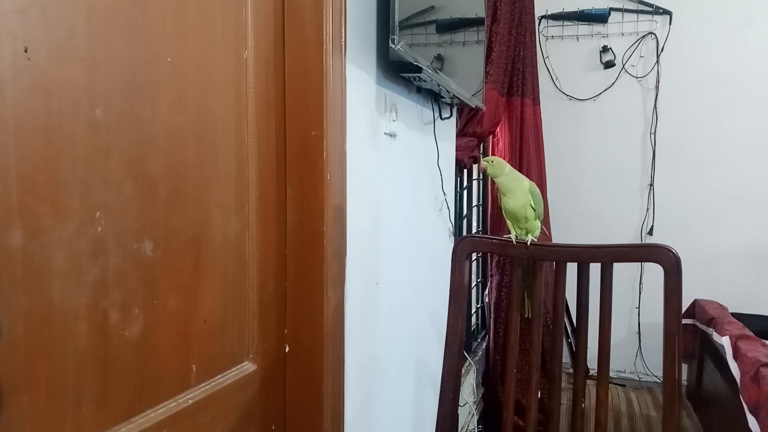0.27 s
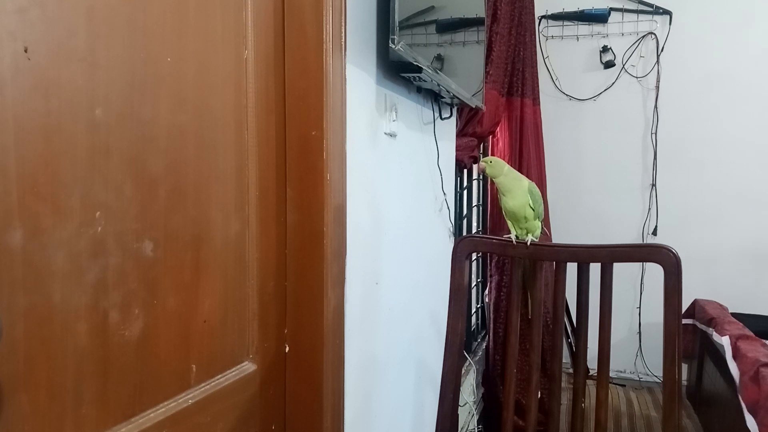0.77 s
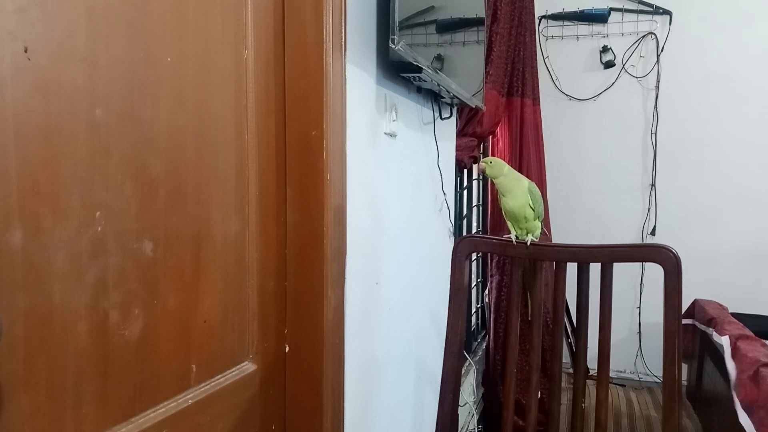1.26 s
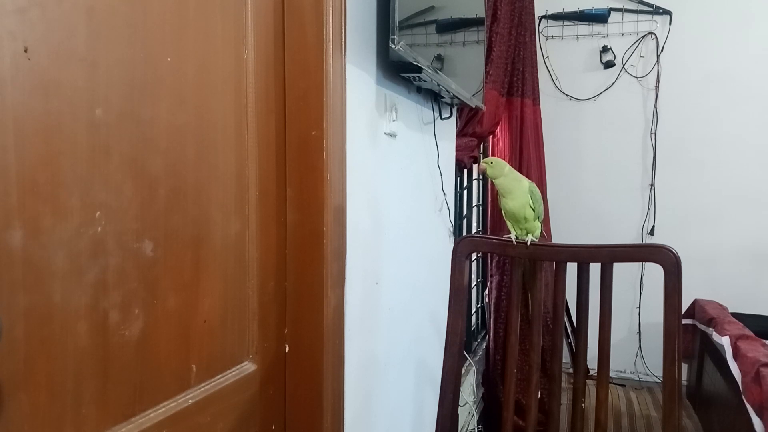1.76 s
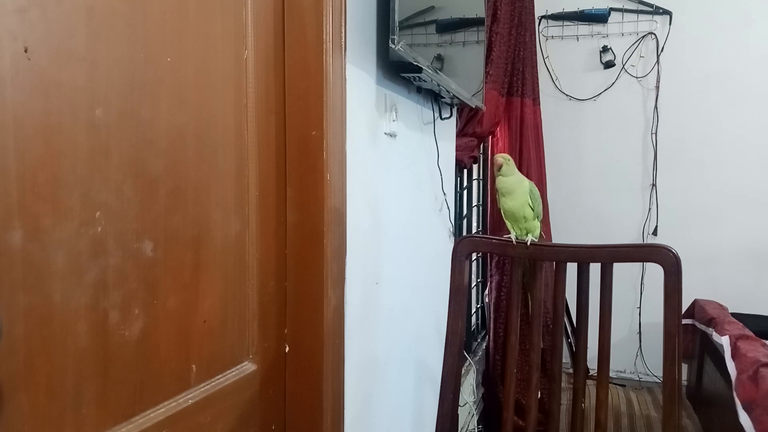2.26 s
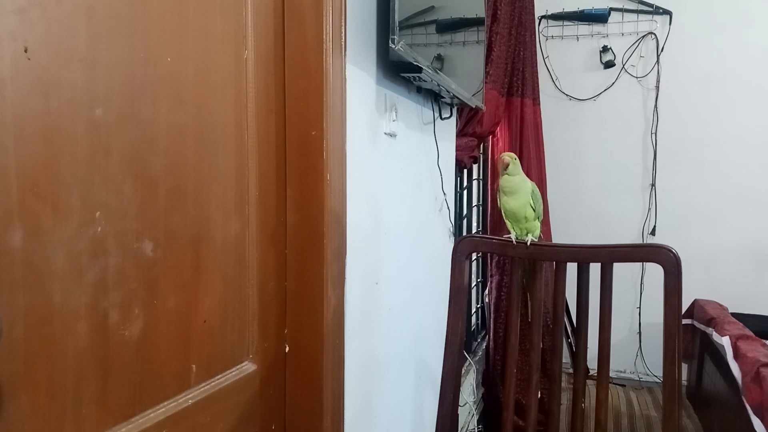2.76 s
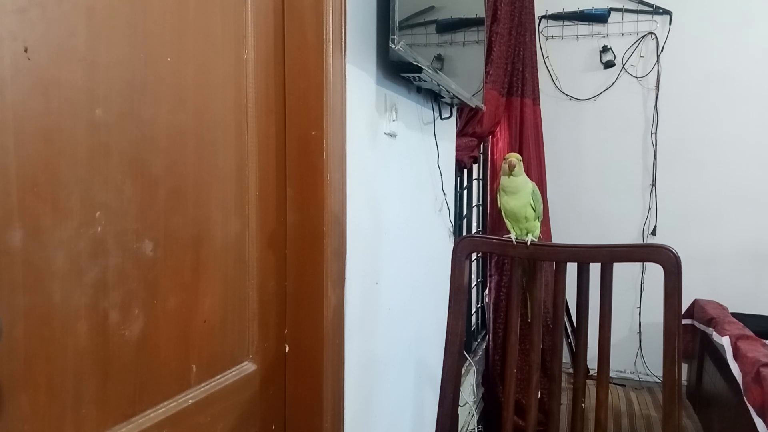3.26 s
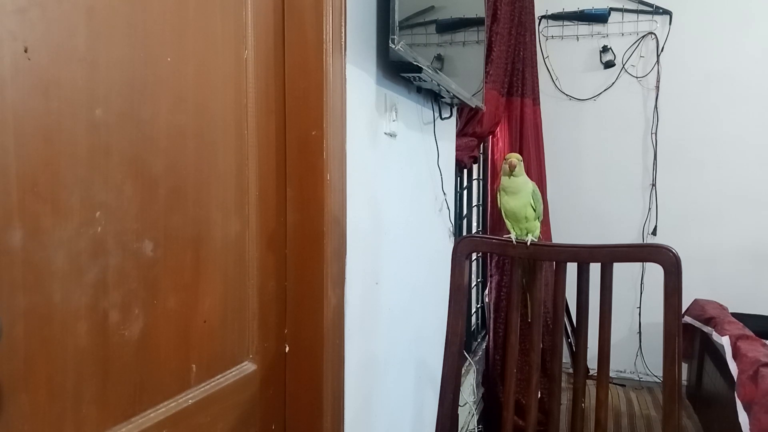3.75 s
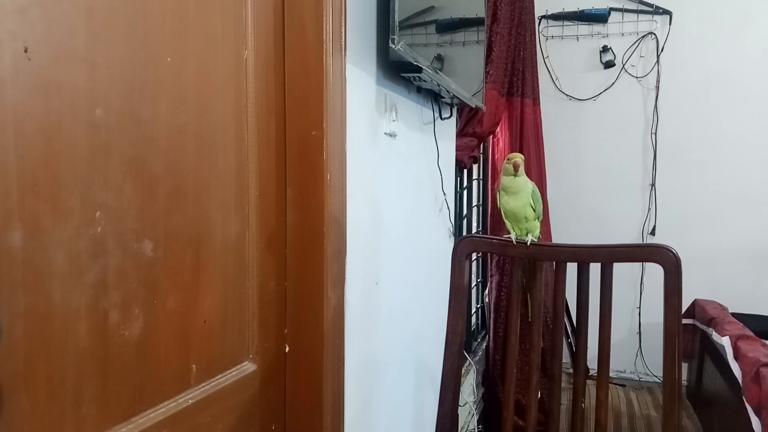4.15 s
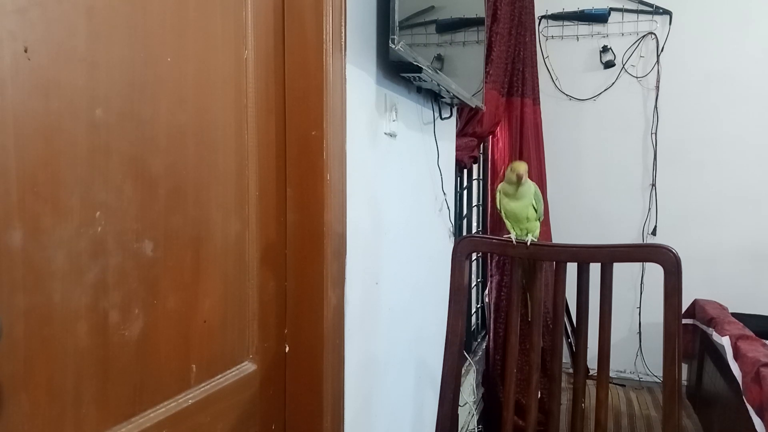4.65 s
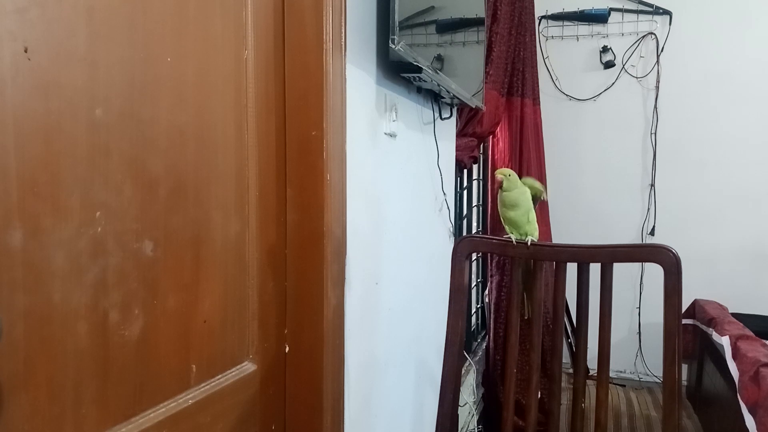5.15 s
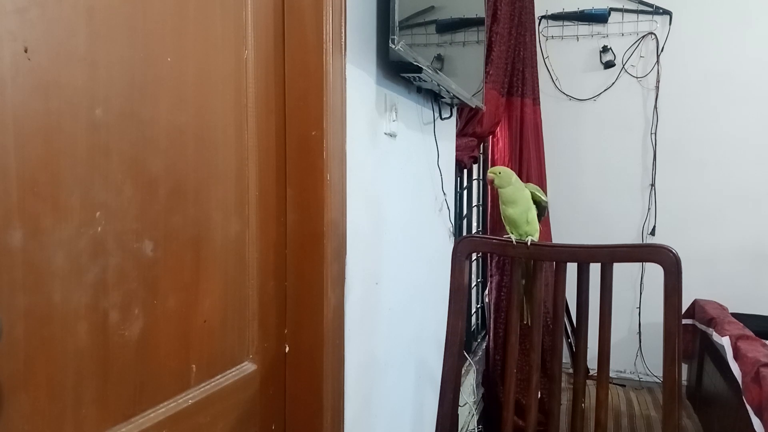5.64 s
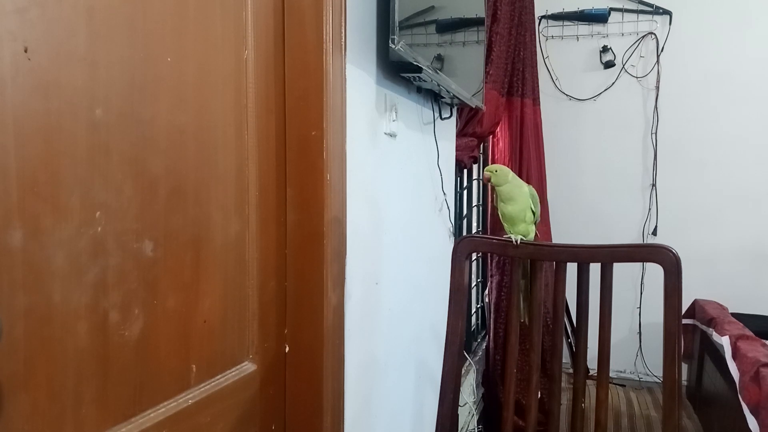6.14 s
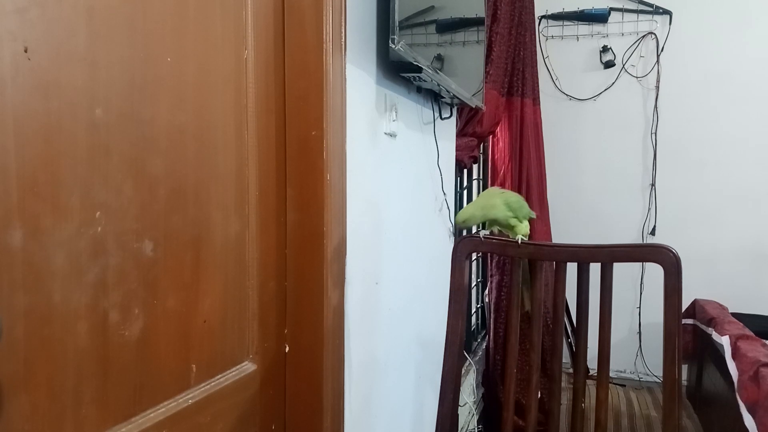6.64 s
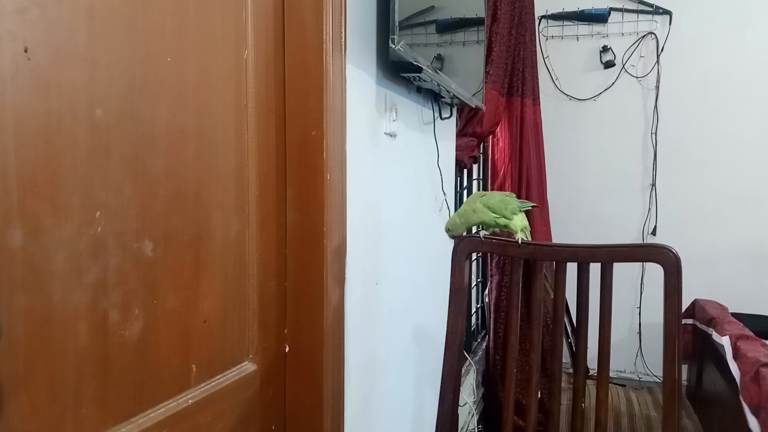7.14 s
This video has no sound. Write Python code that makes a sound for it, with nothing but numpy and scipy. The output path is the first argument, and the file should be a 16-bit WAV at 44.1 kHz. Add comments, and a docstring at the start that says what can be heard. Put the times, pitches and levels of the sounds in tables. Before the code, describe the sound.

A pet parrot calls alone in a small hard-walled room. A clipped squawk and a beak click open, then a short bark, thin whistles and spaced high chirps. A sudden piercing scream cuts in after five seconds, followed by softer chirps and two long rough screeches near the end. Each call rings briefly. Soft air and unsteady low hum stay underneath; a single mono microphone ducks at the loudest calls.

```python
"""A pet parrot chirps, whistles, rasps, barks, screams and screeches in a small hard-walled room.
Its syrinx makes a gliding harmonic tone, lightly shaken in the chirps and strongly in the harsh calls,
mixed with turbulent hiss and coloured by throat and beak; the beak also clicks, as a burst of noise.
Decaying noise lets the room ring after every call, over a wavering rush of air and an unsteady hum.
A gain control ducks under the loudest calls, and the extreme treble is cut off."""
import sys
import numpy as np
from scipy import signal
from scipy.fft import rfft, irfft
from scipy.io import wavfile
from scipy.ndimage import uniform_filter1d

SR = 44100
rng = np.random.default_rng(int(sys.argv[2]) if len(sys.argv) > 2 else 0)


def store_pcm(level_fs):
    """Save levels as 16-bit WAV."""
    pcm = np.round(np.clip(level_fs, -1, 1) * 32767).astype(np.int16)
    wavfile.write(sys.argv[1], SR, np.atleast_2d(pcm).T)


N = 326781
CUTOFF_HZ = 15800   # top of the voice's harmonics and of the finished sound


def parrot():
    """One syrinx sings every call: chirps, whistles, barks, rasps, a scream and long screeches."""
    out = np.zeros(N)
    for kind, table in ((chirp, CHIRP_CALLS), (whistle, WHISTLE_CALLS), (bark, BARK_CALLS), (rasp, RASP_CALLS)):
        for start_s, *shape in table:
            add(out, start_s, kind(*shape))
    add(out, SCREAM_START_S, scream_high())
    add(out, SCREAM_BREAK_S, scream_low())
    for row in SCREECH_CALLS:
        add(out, row[0], screech(*row))
    return out


# the scream: a pure high note gives way to a bright lower note, which tumbles down
SCREAM_START_S, SCREAM_BREAK_S, SCREAM_TUMBLE_S, SCREAM_END_S = 5.078, 5.139, 5.19, 5.288


def scream_high(pitch_hz=2738, scoop_hz=170, scoop_s=0.0069, flick_hz=150, flick_lead_s=0.0135,
                level_db=-9, swell_db=20, swell_s=0.034, rough=0.071, bright_db=-4, lift_db=-3,
                soft_lift_db=-9, flick_lift_db=7, flick_loss_db=2):
    """The pure opening of the scream scoops up to pitch, swells, and flicks up just before it breaks."""
    length_s = SCREAM_BREAK_S - SCREAM_START_S
    t = np.arange(0, length_s, 1 / SR)
    slack = 1 - ramp(t, swell_s)
    flick = step(t, length_s - flick_lead_s, 0.002)
    pitch = pitch_hz - scoop_hz * np.exp(-t / scoop_s) + flick_hz * flick
    loudness_db = level_db - swell_db * slack - flick_loss_db * flick
    second_db = lift_db + soft_lift_db * slack + flick_lift_db * flick
    return open_voice(pitch, loudness_db, rough, bright_db, second_db)


def scream_low(pitch_hz=2232, sag_hz_per_s=1200, tumble_hz=455, tumble_s=0.0079, level_db=-14,
               fade_db_per_s=25, rough=0.094, tumble_rough=0.12, bright_db=4, tumble_dull_db=3.5,
               lift_db=3.0, tumble_lift_db=3, odd_db=-8):
    """The lower note, its odd overtones held back at first, sags, then tumbles, rougher and duller."""
    t = np.arange(0, SCREAM_END_S - SCREAM_BREAK_S, 1 / SR)
    fallen = step(t, SCREAM_TUMBLE_S - SCREAM_BREAK_S, tumble_s)
    pitch = pitch_hz - sag_hz_per_s * t - tumble_hz * fallen
    loudness_db = level_db - fade_db_per_s * t
    slope_db = bright_db - tumble_dull_db * fallen
    second_db = lift_db + tumble_lift_db * fallen
    held_back_db = odd_db * (1 - ramp(fallen, 0.18))
    return open_voice(pitch, loudness_db, rough + tumble_rough * fallen, slope_db, second_db, odd_db=held_back_db)


# voice in each register: pitch_hz, level_db, brightness_db_per_octave, second_harmonic_lift_db
GROWL, HIGH, CLOSE = (1652, -6, -3, 10.5), (2659, -1.5, 3, 3), (1975, 4.4, 2.3, 10.6)
CLOSE_ROUGH = 0.25
REGISTER_CHANGE_S, SLACK_HZ, SLACK_S = 0.00755, 241.8, 0.038   # change width; depth and half width of the sag
SCREECH_FADE_DB, SCREECH_FADE_S, SCREECH_ONSET_HZ = 17, 0.039, 170   # the growl fades in, sinking in pitch
# long screeches, from low growl through a leap to the high register, then a drop to the closing tone:
# start_s, leap_s, slackest_s, drop_s, end_s, level_db (the register's level is added),
# growl_roughness (0-1), high_roughness (0-1)
SCREECH_CALLS = [(6.021, 6.126, 6.14, 6.245, 6.303, -31.5, .32, 0.48),
                 (6.996, 7.044, 7.105, 7.25, 7.31, -32.5, 1.01, .62)]


def screech(start_s, leap_s, slack_s, drop_s, end_s, level_db, growl_rough, high_rough,
            change_rough=0.32, wobble=0.0153, wobble_hz=70):
    """The syrinx jumps between registers in one go and turns rougher during each change."""
    t = np.arange(start_s, end_s, 1 / SR)
    leapt = step(t, leap_s, REGISTER_CHANGE_S)
    dropped = step(t, drop_s, REGISTER_CHANGE_S)
    high = leapt - dropped
    shares = np.array([1 - leapt, high, dropped])
    pitch, register_db, bright_db, lift_db = np.transpose([GROWL, HIGH, CLOSE]) @ shares
    rough = np.array([growl_rough, high_rough, CLOSE_ROUGH]) @ shares + change_rough * np.sin(np.pi * high)
    fading = 1 - ramp(t - start_s, SCREECH_FADE_S)
    sag_hz = SLACK_HZ * high * np.exp(-((t - slack_s) / SLACK_S) ** 2)
    pitch = pitch + SCREECH_ONSET_HZ * fading - sag_hz
    pitch = pitch * (1 + wobble * rough * tremble(wobble_hz, len(t)))
    loudness_db = level_db + register_db - SCREECH_FADE_DB * fading
    return harsh_voice(reshaped(PINCHED_THROAT), pitch, loudness_db, rough * (1 - fading ** 2), bright_db, lift_db)


# a bark starts flat by a share of its pitch, and softer, for a share of its length
BARK_SCOOP, BARK_RISE_AT, BARK_SWELL_DB = 0.09, 0.35, 4
# short harsh barks: start_s, length_s, pitch_hz, level_db, roughness (0-1),
# brightness_db_per_octave, second_harmonic_lift_db
BARK_CALLS = [(0, 0.016, 1668, -16.5, 0.78, -2, 8), (1.578, .047, 1562, -24, 0.7, -1.5, 3)]


def bark(length_s, pitch_hz, level_db, rough, bright_db, lift_db, snap_s=0.0024):
    """An abrupt rough note that snaps up to its pitch and full strength."""
    t = np.arange(0, length_s, 1 / SR)
    slack = 1 - step(t, BARK_RISE_AT * length_s, snap_s)
    pitch = pitch_hz * (1 - BARK_SCOOP * slack)
    return harsh_voice(THROAT_COLOUR, pitch, level_db - BARK_SWELL_DB * slack, rough, bright_db, lift_db)


# rise to full level; place (0-1) and width of the surge; half width of the flick
CHIRP_SWELL_DB, CHIRP_SURGE_AT, CHIRP_SURGE_S, FLICK_S = 17.5, 0.48, 0.0077, 0.0169
# chirps that swell, glide and flick up once: start_s, length_s, pitch_hz, glide_hz, flick_hz,
# flick_place (0-1), level_db (at full effort), roughness (0-1, at full effort),
# brightness_db_per_octave (at full effort), second_harmonic_lift_db
CHIRP_CALLS = [ (3.075, 0.1, 2855, -78, 183, 0.41, -33, 0.18, -3.5, 2.5),
               (3.755, 0.11, 2608, 18.5, 119.6, 0.74, -36, 0.2, -0.5, 4),
               (4.55, .11, 2591, -80, 73, 0.85, -38.5, .11, 4, 1.5),
               (5.451, .11, 2468, 218, 170, .75, -35.5, 0.23, 0, 2.5),
               (5.711, 0.094, 3036, -91, 75.2, 0.34, -41, 0.3, -1, -7)]


def chirp(length_s, pitch_hz, glide_hz, flick_hz, flick_at, level_db, rough, bright_db, lift_db,
          soft_dull_db=3, surge_share=0.3):
    """Effort builds steadily, then surges midway; it makes the note louder, brighter and rougher."""
    t = np.arange(0, length_s, 1 / SR)
    surge_s = CHIRP_SURGE_AT * length_s
    effort = (1 - surge_share) * ramp(t, surge_s) + surge_share * step(t, surge_s, CHIRP_SURGE_S)
    flick = np.exp(-((t - flick_at * length_s) / FLICK_S) ** 2)
    pitch = pitch_hz + glide_hz * t / length_s + flick_hz * flick
    loudness_db = level_db - CHIRP_SWELL_DB * (1 - effort)
    slope_db = bright_db - soft_dull_db * (1 - effort)
    return clear_voice(pitch, loudness_db, rough * (1 + effort) / 2, slope_db, lift_db)


WHISTLE_FADE_S, WHISTLE_FADE_DB = 0.03, 6.5
# thin whistles: start_s, length_s, pitch_hz, glide_hz, level_db (once faded in), roughness (0-1),
# brightness_db_per_octave, second_harmonic_lift_db
WHISTLE_CALLS = [ (0, 0.037, 2430, 9, -40, 0, -11, 2), (1.694, 0.0714, 2501, -140, -34, 0.06, -14, 7),
                 (2.498, 0.19, 2087, 3.5, -75, 0.15, -10, 7), (3.44, .15, 3037, 34, -65, 0.2, -11, 3),
                 (4.967, 0.13, 2944, -36, -59, 0.68, -12, -3),
                 (5.768, 0.047, 2106, -1, -54.5, 0.2, -16, 11),
                 (6.476, .085, 2817, -190, -43, 0.19, -9, 0.5), (6.844, 0.23, 2855, 386, -63, 0.64, -10, 1),
                 (6.963, 0.07, 1793, 37, -53, 0.22, -10, 1), (7.2, 0.049, 2014, -15, -30.5, .15, -1, 18)]


def whistle(length_s, pitch_hz, glide_hz, level_db, rough, bright_db, lift_db):
    """A thin tone that glides in a straight line, fades in and holds its level."""
    t = np.arange(0, length_s, 1 / SR)
    fade_db = WHISTLE_FADE_DB * (1 - ramp(t, WHISTLE_FADE_S))
    return clear_voice(pitch_hz + glide_hz * t / length_s, level_db - fade_db, rough, bright_db, lift_db)


RASP_SWELL_DB, RASP_PEAK_AT, RASP_ROUGH = 9, 0.46, 0.8   # place of full level (0-1), roughness at the end (0-1)
# soft low rasps: start_s, length_s, pitch_hz, level_db (once swelled),
# brightness_db_per_octave, second_harmonic_lift_db
RASP_CALLS = [(2.892, 0.091, 1219, -53.5, -2, 0.5), (3.568, .11, 801, -50, 3.5, 14.5),
              (4.375, .11, 818, -52.5, 3, 8)]
# relative colour of throat and beak in the soft rasps: frequency_hz, gain_db
RASP_COLOUR = [(800, 6.5), (1600, -1.5), (2400, 6), (3100, -3.5), (3700, 1.5), (4700, -9.5), (6200, -1),
               (7700, -20), (8700, -14), (10500, -35), (15000, -49)]


def rasp(length_s, pitch_hz, level_db, bright_db, lift_db, climb=0.03):
    """A low, soft tone that grows rougher as turbulent hiss rises beside it."""
    t = np.arange(0, length_s, 1 / SR)
    along = t / length_s
    pitch = pitch_hz * (1 + climb * (along - 0.5))
    loudness_db = level_db - RASP_SWELL_DB * (1 - ramp(along, RASP_PEAK_AT))
    return call(pitch, loudness_db, RASP_ROUGH * along, bright_db, lift_db, RASP_COLOUR,
                jitter=0.055, jitter_hz=290, shimmer=0.49, hiss_db=1.5)


# extra colour of the wide-open beak in the scream: frequency_hz, gain_db
OPEN_BEAK = [(1450, -0.5), (2000, 0.5), (3300, 2.5), (4100, -2.5), (5200, 7.5), (5900, 3.5), (6800, -5),
             (8700, 7), (10500, -1.5), (15000, 4.5)]


def open_voice(*controls, odd_db=0):
    """The full voice through a wide-open beak."""
    return call(*controls, reshaped(OPEN_BEAK), jitter=0.064, jitter_hz=420, shimmer=0.61,
                hiss_db=-15, odd_db=odd_db)


# extra colour of the tightened throat in a screech: frequency_hz, gain_db
PINCHED_THROAT = [(2000, -0.5), (2600, 8.5), (3300, -7.5), (4100, -1), (5200, -3), (7000, 1), (8400, -4.5),
                  (10000, 6.5), (15800, 1)]


def harsh_voice(throat, *controls):
    """The forced, shaken voice of barks and screeches."""
    return call(*controls, throat, jitter=0.062, jitter_hz=420, shimmer=0.62, hiss_db=-14)


# extra colour of the half-shut beak in chirps and whistles, dull at the top: frequency_hz, gain_db
HALF_SHUT_BEAK = [(4100, 1), (5200, 0), (11000, -1.5), (13500, -6.5)]


def clear_voice(*controls):
    """The light voice of chirps and whistles, with soft edges."""
    return call(*controls, reshaped(HALF_SHUT_BEAK), jitter=0.08, jitter_hz=200, shimmer=0.4,
                hiss_db=-26.5, edge_s=0.0048)


# relative colour of throat and beak in the full voice: frequency_hz, gain_db
THROAT_COLOUR = [(1000, -34.5), (1450, -7), (2000, -3.5), (2700, 2.5), (3300, 3.5), (4100, -1.5),
                 (5200, -0.5), (5900, -2), (6800, 3), (7700, -11), (8700, -10.5), (9300, -17), (10500, -21),
                 (12000, -39.5), (13800, -38), (14700, -36.5), (15800, -33.5)]


def reshaped(extra):
    """The throat's resonances with an extra colour on top."""
    return [(hz, db + at_hz(extra, hz)) for hz, db in THROAT_COLOUR]


def call(pitch, level_db, rough, bright_db, lift_db, throat, jitter, jitter_hz, shimmer, hiss_db,
         edge_s=0.0023, odd_db=0):
    """A harmonic tone, its pitch and strength shaken by roughness, and turbulent air pass the throat."""
    size = len(pitch)
    t = np.arange(size) / SR
    rough = np.clip(rough, 0, 1)
    shaken_pitch = pitch * (1 + jitter * rough * tremble(jitter_hz, size))
    phase = 2 * np.pi * np.cumsum(shaken_pitch) / SR
    k = np.arange(1, 17)[:, None]   # harmonic numbers
    harmonic_db = bright_db * np.log2(k) + lift_db * (k == 2) + odd_db * (k % 2) * (k > 1)
    weight = from_db(harmonic_db) * (k * pitch < CUTOFF_HZ)
    # strength the throat would let through, divided out so that level_db sets the loudness
    passed = np.sqrt(np.sum((weight * from_db(at_hz(throat, k * pitch))) ** 2, axis=0) / 2)
    shake = rms_one(np.exp(shimmer * rough * tremble(jitter_hz, size)))
    syrinx = shake * np.sum(weight * np.sin(k * phase), axis=0) / passed
    # the shaking harmonics slide through the fixed resonances of throat and beak
    tone = irfft(rfft(syrinx) * from_db(at_hz(throat, np.fft.rfftfreq(size, 1 / SR))), size)
    hiss = from_db(hiss_db) * rough * coloured_noise(throat, size)
    envelope = from_db(level_db) * ramp(np.minimum(t, t[-1] - t), edge_s)
    return envelope * (tone + hiss)


# sharp clicks of the beak: start_s, level_db (of the noise before it decays)
BEAK_CLICKS = [(0.175, -33)]
# relative colour of a click: frequency_hz, gain_db
BEAK_COLOUR = [(1500, -34), (4000, -27), (6300, 5.5), (8000, -8), (11000, -14), (15500, -18)]


def beak(decay_s=0.0043):
    """A hard, bright snap of noise that dies in a few milliseconds."""
    out = np.zeros(N)
    t = np.arange(SR // 20) / SR
    for start_s, level_db in BEAK_CLICKS:
        snap = coloured_noise(BEAK_COLOUR, len(t)) * np.exp(-t / decay_s)
        add(out, start_s, from_db(level_db) * snap)
    return out


# time for the room's tail to fall by 60 dB: frequency_hz, decay_s
ROOM_DECAY = [(1000, .6), (2800, 0.46), (5500, 0.42), (8500, 0.34), (15000, 0.3)]


def room(x, wet_db=-1.5, early_db=-3.5, early_s=0.051, first_echo_s=0.0013):
    """Hard walls answer with a diffuse noise tail, stronger at its start and shorter in the treble."""
    t = np.arange(SR) / SR
    hz = np.fft.rfftfreq(SR, 1 / SR)
    white = rfft(rng.standard_normal(SR))
    tail = 0
    # overlapping bands, each with its own decay
    for share, (centre_hz, t60) in zip(np.eye(len(ROOM_DECAY)), ROOM_DECAY):
        band = at_hz(np.column_stack([np.array(ROOM_DECAY)[:, 0], share]), hz)
        tail = tail + irfft(white * band, SR) * np.exp(-np.log(1000) * t / t60)
    tail = tail * (1 + from_db(early_db) * np.exp(-t / early_s)) * (t > first_echo_s)
    tail = tail / np.sqrt(np.sum(tail ** 2))
    return x + from_db(wet_db) * signal.fftconvolve(x, tail)[:N]


AIR_DB = -50   # level around which the air wavers
# relative spectrum of the steady air: frequency_hz, density_db_per_hz
AIR_COLOUR = [(25, -41), (45, -33.5), (100, -13.5), (150, -6.5), (350, -8), (530, -16.5), (850, -15),
              (1500, -21.5), (2700, -29), (3500, -43), (7000, -48), (8800, -54.5), (11000, -64.5),
              (16000, -60.5)]
# unsteady hum lines: pitch_hz, width_hz, level_db
HUM_LINES = [(69.6, 14, -73), (139.4, 19, -54), (605, 7.3, -65), (1127, 10, -69.5)]


def background(waver_db=1.94):
    """Noise makes a soft, wavering rush of air; randomly beating tones make a hum, as from a fan."""
    out = from_db(AIR_DB + waver_db * tremble(8, N)) * coloured_noise(AIR_COLOUR, N)
    for hz, width_hz, level_db in HUM_LINES:
        carrier = 2 * np.pi * hz * np.arange(N) / SR
        line = tremble(width_hz, N) * np.cos(carrier) + tremble(width_hz, N) * np.sin(carrier)
        out = out + from_db(level_db) * line
    return out


def from_db(db):
    """Decibels to gain."""
    return 10 ** (np.asarray(db) / 20)


def rms_one(x):
    """Scale to unit power."""
    return x / np.sqrt(np.mean(x ** 2) + 1e-20)


def at_hz(points, hz):
    """Read a table along a log-frequency axis."""
    known_hz, values = np.transpose(points)
    return np.interp(np.log(np.maximum(hz, 1)), np.log(known_hz), values)


def coloured_noise(spectrum, size):
    """Noise of unit power with the shape of the given spectrum."""
    hz = np.fft.rfftfreq(size, 1 / SR)
    return rms_one(irfft(rfft(rng.standard_normal(size)) * from_db(at_hz(spectrum, hz)), size))


def tremble(rate_hz, size):
    """Random motion of unit power, up to about the given rate."""
    hz = np.fft.rfftfreq(size, 1 / SR)
    return rms_one(irfft(rfft(rng.standard_normal(size)) * np.exp(-(hz / rate_hz) ** 2), size))


def step(t, at_s, width_s):
    """A smooth change from 0 to 1 around a moment."""
    return 0.5 + 0.5 * np.tanh((t - at_s) / (2 * width_s))


def ramp(t, length):
    """A straight rise from 0 to 1, then a hold."""
    return np.clip(t / length, 0, 1)


def add(track, start_s, sound):
    """Mix a sound into a track."""
    first = max(0, int(start_s * SR))
    track[first:first + len(sound)] += sound[:max(0, N - first)]


def scene():
    """The bird rings in its room over the background, in one channel."""
    return (room(parrot() + beak()) + background())[None]


def gain_control(x, threshold_db=-21.5, squeeze=0.72, release_db_per_s=220, window_s=0.0085, attack_s=0.0083):
    """Takes off a share (squeeze) of the level above the threshold and recovers quickly."""
    power = uniform_filter1d(x[0] ** 2, max(1, int(window_s * SR)))
    level_db = 10 * np.log10(np.maximum(power, 1e-12))
    # hold each peak of the excess and let it fall at the release rate
    fall = release_db_per_s * np.arange(N) / SR
    held_db = np.maximum.accumulate(np.maximum(level_db - threshold_db, 0) + fall) - fall
    lag = np.exp(-1 / (attack_s * SR))
    smooth_db, _ = signal.lfilter([1 - lag], [1, -lag], held_db, zi=[lag * held_db[0]])
    return x * from_db(-squeeze * smooth_db)


def record(dry):
    """Gain control, then a steep cut of the top."""
    top_cut = signal.ellip(12, 0.1, 90, CUTOFF_HZ, fs=SR, output="sos")
    return signal.sosfilt(top_cut, gain_control(dry))


dry = scene()
out = record(dry)
store_pcm(out)
```